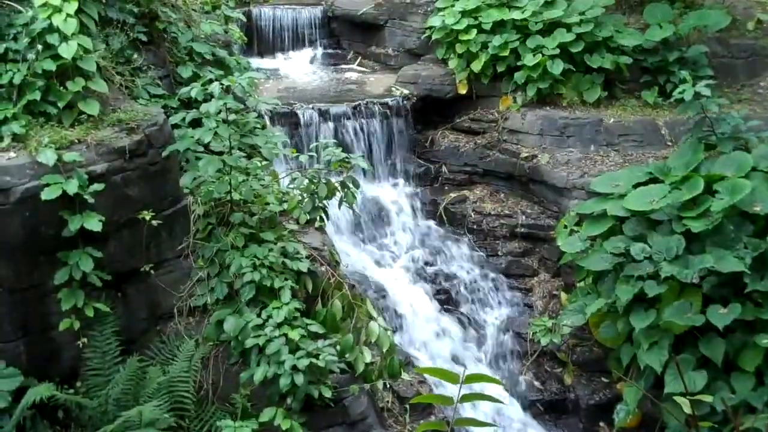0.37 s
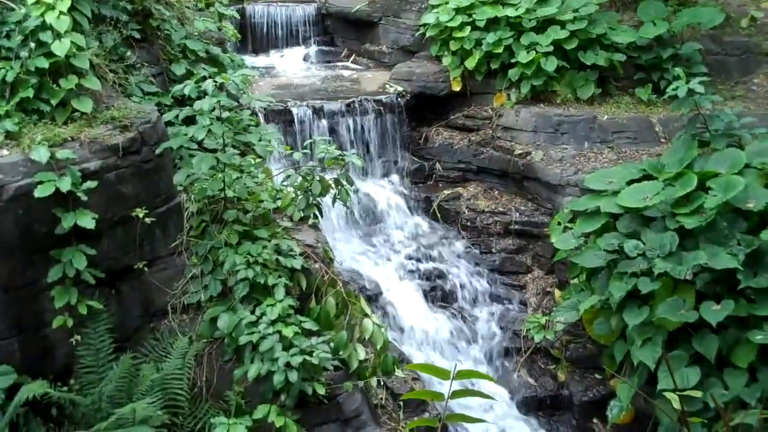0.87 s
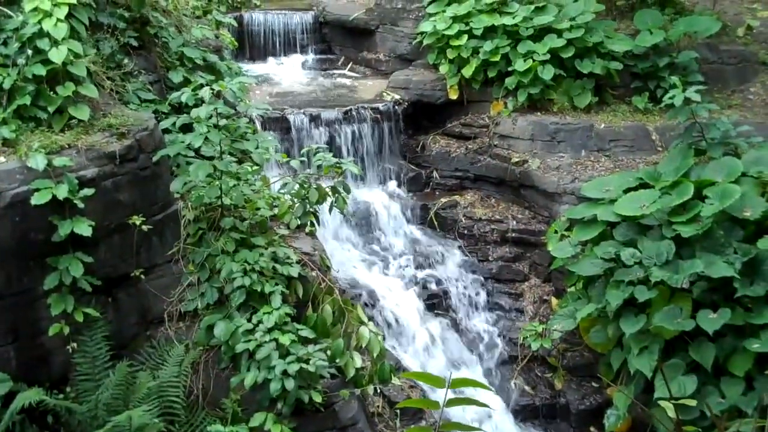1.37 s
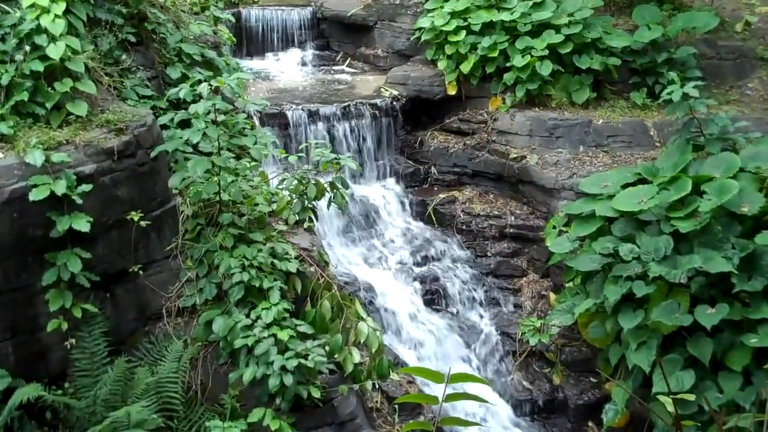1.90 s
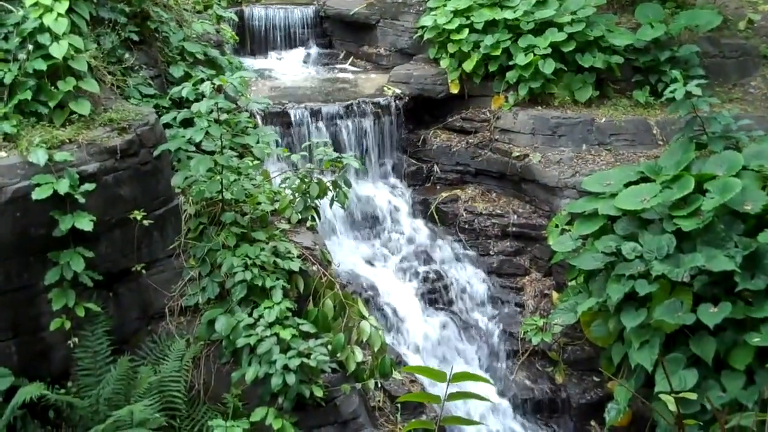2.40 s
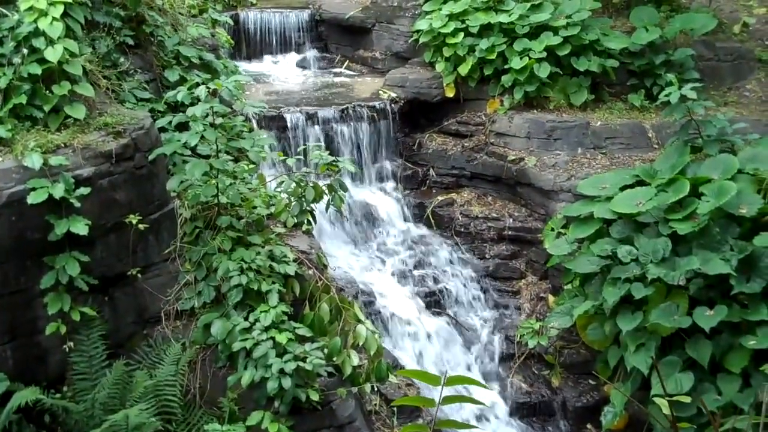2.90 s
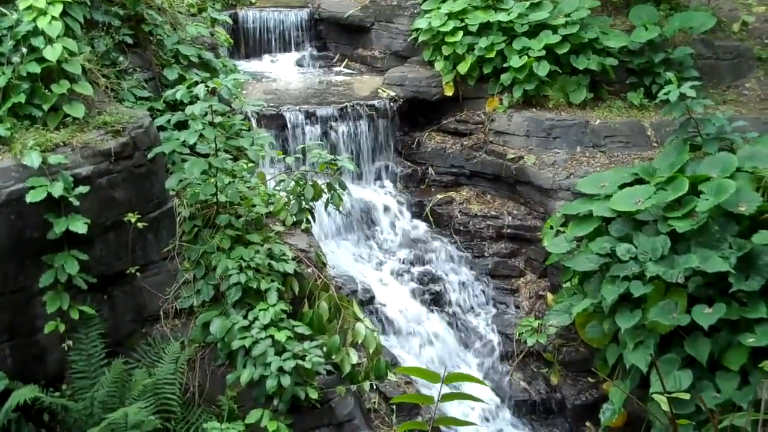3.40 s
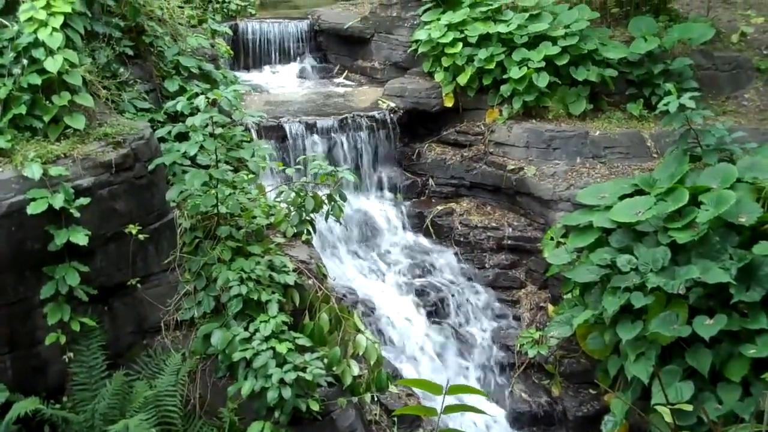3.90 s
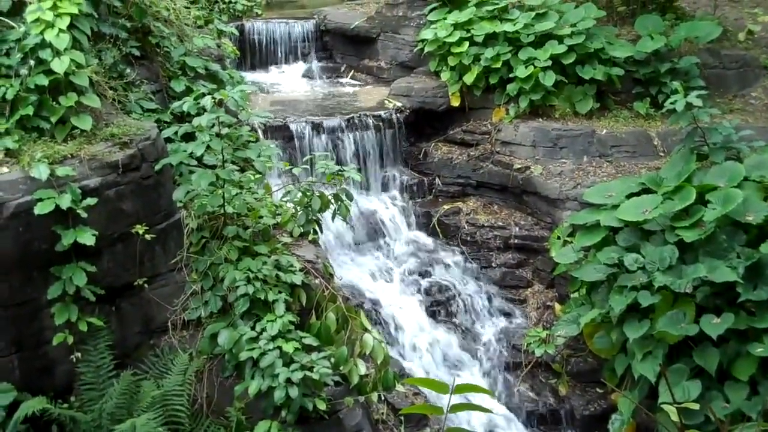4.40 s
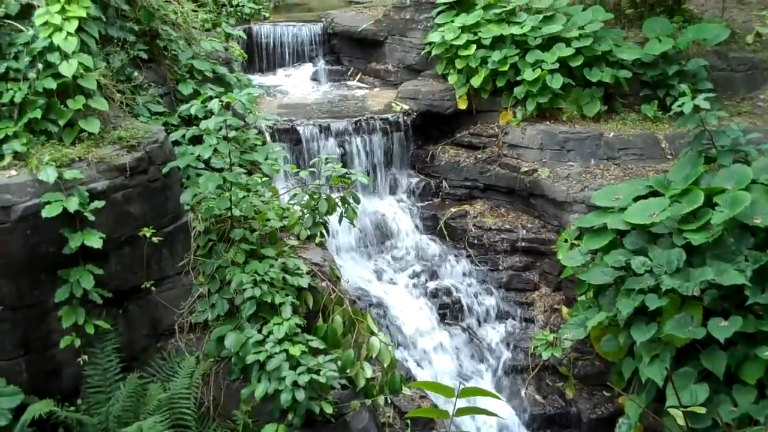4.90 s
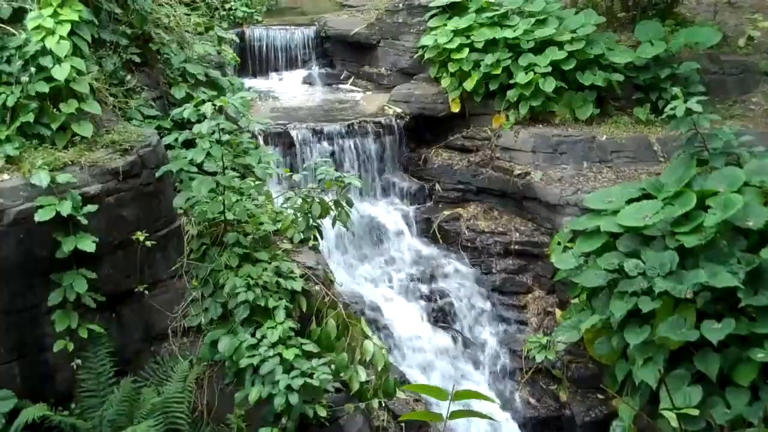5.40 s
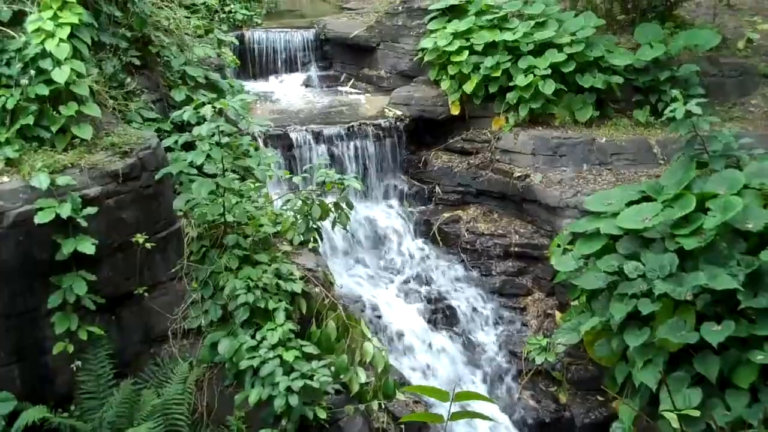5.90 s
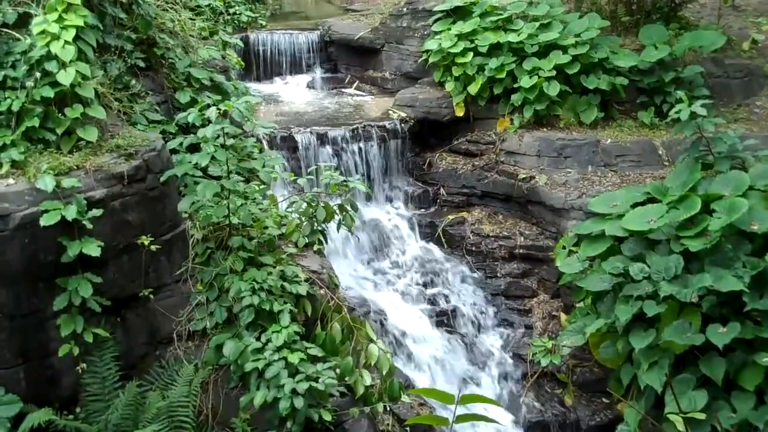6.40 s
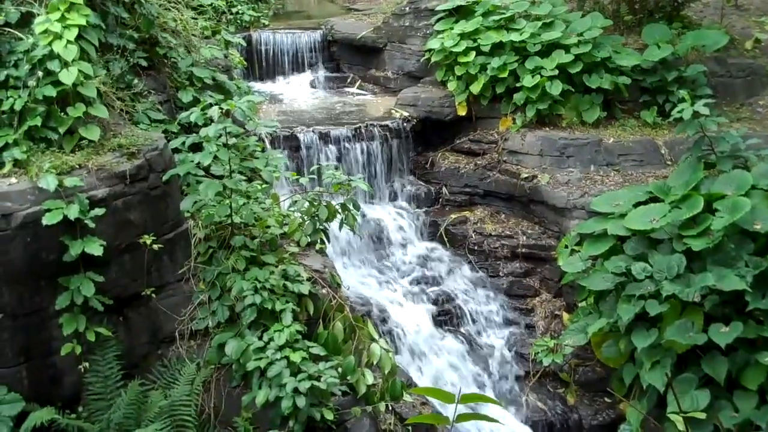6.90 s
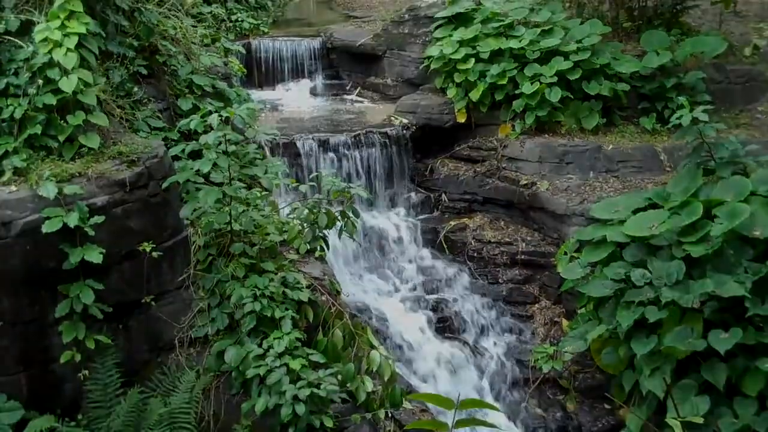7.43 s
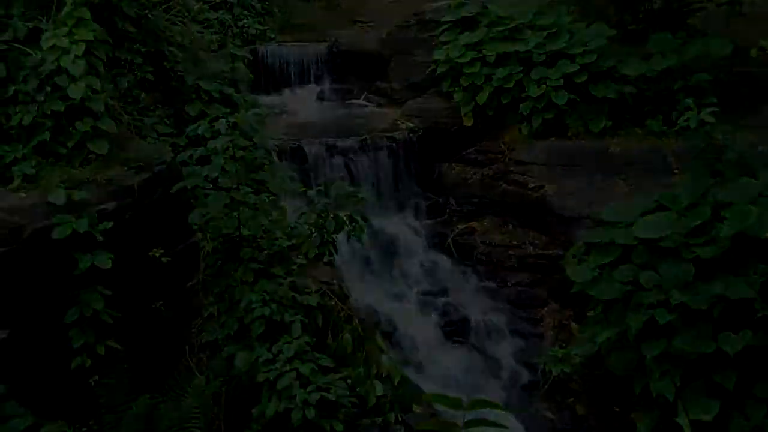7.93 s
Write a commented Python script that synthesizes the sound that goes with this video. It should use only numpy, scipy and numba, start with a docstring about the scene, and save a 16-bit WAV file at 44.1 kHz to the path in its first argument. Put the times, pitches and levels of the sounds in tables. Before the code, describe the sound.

A hand-held stereo microphone near a small waterfall among leafy plants hears continuous broad splashing: strong midrange rush, sizzling spray on top, gentle rumble beneath. Level hardly changes, with only fine flutter and two faint upward bubble gurgles nearly buried in it. A short rise opens it; a smooth fade closes it, leaving a faint trace of water.

```python
"""A small waterfall on rock ledges, a few metres from a hand-held camera with two microphone ports.
Noise and countless ringing bubbles merge into a rush, above the low noise roar of the plunge pool;
two single bubbles gurgle upward in pitch. Long waves reach both ports alike, short ones less so, and
each port rings at its own pitch. The sound fades in, and fades toward the end without reaching silence."""
import sys
import numpy as np
from scipy import signal
from scipy.fft import rfft, irfft, next_fast_len
from scipy.io import wavfile
from scipy.ndimage import uniform_filter1d, map_coordinates
from numba import njit

SR = 44100
rng = np.random.default_rng(int(sys.argv[2]) if len(sys.argv) > 2 else 0)


def file_out(sig):
    """Save sig as 16-bit WAV at sys.argv[1]."""
    # one column per channel
    cols = np.atleast_2d(sig).T
    # limit, then scale
    lim = np.clip(cols, -1, 1)
    pcm = np.round(lim * 32767).astype(np.int16)
    wavfile.write(sys.argv[1], SR, pcm)


def ratio_of_db(decibels):
    """Turn decibels (scalar or array-like) into linear amplitude factors; 0 dB maps to 1."""
    return 10 ** (np.asarray(decibels, float) / 20)


N = 354916
SIZE = next_fast_len(N)  # transform length [samples]
HZ = np.fft.rfftfreq(SIZE, 1 / SR)


def table(rows):
    """Logarithmic pitch scale: (frequency [Hz], value) rows are joined along log frequency."""
    hz, value = np.transpose(rows)
    return np.interp(np.log(HZ + 1), np.log(hz), value)


def unit(x):
    """Normalization of power: the signal is scaled to rms 1."""
    return x / np.sqrt(np.mean(x ** 2))


def surges(x, rate, per_octave, depth_db):
    """Amplitude modulation: patches of the flow swell and sink, each over a range of pitch for a moment."""
    hz, time, spectrum = signal.stft(x, SR, nperseg=512)
    pitch_place = per_octave * np.log2(1 + hz / 200)
    time_place = rate * time  # rate: random grid points per second
    where = np.meshgrid(pitch_place, time_place, indexing="ij")
    grid = rng.standard_normal((64, 400))
    gain_db = depth_db * map_coordinates(grid, where, order=1)
    return signal.istft(spectrum * ratio_of_db(gain_db), SR, nperseg=512)[1][:, :N]


# colour of the plunge pool: (frequency [Hz], gain [dB])
POOL_COLOUR = [(20, -36), (33, -28), (52, -8), (68, -16.5), (110, -12), (220, -11), (305, -6.5), (430, -13),
               (600, -27.5)]


def plunge_pool():
    """Turbulence noise: churned water roars low and heaves slowly, in three unrelated parts."""
    noise = rng.standard_normal((3, N))
    heaving = surges(noise, rate=3.4, per_octave=1.8, depth_db=0.34)
    return rfft(heaving, SIZE) * ratio_of_db(table(POOL_COLOUR))


# large bubbles that stand out: (time [s], starting frequency [Hz], relative level [dB])
LARGE_BUBBLES = [(1.9, 2700, -17), (5.56, 994, -19)]


def gurgles():
    """Bubble resonance: single long tones rise in pitch, shaken in level by the churning water."""
    length_s, rise = 0.091, 0.22  # rise: share by which the pitch climbs
    out, s = np.zeros(N), np.arange(N) / SR
    for t, start_hz, db in LARGE_BUBBLES:
        u = np.clip((s - t) / length_s, 0, 1)  # progress from 0 to 1
        swell = np.sin(np.pi * u)
        cycles = length_s * start_hz * (u + rise * u ** 2 / 2)
        out += ratio_of_db(db) * swell * np.sin(2 * np.pi * cycles)
    shake = unit(uniform_filter1d(rng.standard_normal(N), size=250))
    return rfft(out * ratio_of_db(4.5 * shake), SIZE)


@njit
def ring(start, hz, size, cycles, rise, length):
    """Damped resonance: each bubble is a decaying sine whose pitch climbs as it nears the surface."""
    out = np.zeros(length)
    for k in range(len(start)):
        w = 2 * np.pi * hz[k] / SR
        tau = cycles[k] * SR / hz[k]  # decay time [samples]
        n = min(int(4 * tau), length - start[k])
        step = np.exp(1j * w - 1 / tau)  # rotation and decay per sample
        climb = np.exp(1j * w * rise / tau)  # speeds up the rotation
        z = size[k] + 0j
        for i in range(n):
            out[start[k] + i] += z.imag
            z *= step
            step *= climb
    return out


def bubbles(low_hz, high_hz, turns, scatter_db, rise, count):
    """Random superposition: bubbles fall anywhere in time and evenly in Hz, so high octaves hold more."""
    when, pitch, loudness, damping = rng.random((count, 4)).T
    start = (when * N).astype(np.int64)
    hz = low_hz + (high_hz - low_hz) * pitch
    # high ones ring briefly but louder: an even spectrum
    size = np.sqrt(hz) * ratio_of_db(scatter_db * loudness)
    cycles = turns * (.5 + damping)
    return unit(ring(start, hz, size, cycles, rise, N))


# colour of the white water on the ledges: (frequency [Hz], gain [dB])
RUSH_COLOUR = [(300, -27.5), (430, -17.5), (570, -6), (700, -3), (830, -4.5), (1020, -1), (1450, -3),
               (2000, -2.5), (3000, -2.5), (4200, -5.5), (6500, -10.5), (8600, -11.5), (9600, -13),
               (11500, -11.5)]


def white_water():
    """Incoherent sources: three unrelated parts, one heard by both ports and one more by each."""
    parts = []
    for _ in range(3):
        spray = unit(rng.standard_normal(N))
        ringing = bubbles(349.6, 13990.0, turns=15.65, scatter_db=15.4, rise=0.0607, count=50000)
        parts.append(spray + ratio_of_db(-8) * ringing)
    quick = surges(np.array(parts), rate=36., per_octave=1.5, depth_db=0.7)
    slow = surges(quick, rate=3.7, per_octave=0.19, depth_db=0.11)
    return rfft(slow, SIZE) * ratio_of_db(table(RUSH_COLOUR))


# how alike both ports hear the wide fall: (frequency [Hz], squared coherence [0-1])
COHERENCE = [(30, .7), (70, .99), (300, .99), (430, .9), (600, .98), (1150, .95), (1450, .64), (3050, .7),
             (3600, .33), (7000, .27), (9800, .02)]
# right port against left, slightly different below 10 kHz and much duller above:
# (frequency [Hz], gain [dB])
RIGHT_BALANCE = [(700, 1.15), (1350, -0.8), (2330, 2), (3300, -.5), (5240, -0.5), (7000, 0), (9700, -1),
                 (12100, -14), (14200, -43)]


def scene():
    """Spatial coherence: short waves from the wide fall reach the two ports less alike than long ones."""
    right_lead_s = 3.2e-5  # the right port is nearer the fall, so it hears it first
    both, left, right = plunge_pool() + white_water()
    share = np.sqrt(table(COHERENCE))  # share of the power common to both ports
    common = np.sqrt(share) * both
    separate = np.sqrt(1 - share) * np.array([left, right])
    pair = common + separate + gurgles()
    right_response = ratio_of_db(table(RIGHT_BALANCE)) * np.exp(2j * np.pi * HZ * right_lead_s)
    return irfft(pair * np.array([np.ones(len(HZ)), right_response]), SIZE)[:, :N]


# port cavities, left then right: (resonance [Hz], sharpness Q [1], bass cut [Hz])
PORT_CAVITIES = [(7350, 7.6, 71), (6116, 7.75, 17)]


def port_cavities(dry):
    """Cavity resonance: each port is a resonant second-order low-pass, with a first-order bass cut."""
    responses = []
    for hz, q, cut_hz in PORT_CAVITIES:
        bass_cut = 1j * HZ / (cut_hz + 1j * HZ)
        resonance = 1 / (1 - (HZ / hz) ** 2 + 1j * HZ / hz / q)
        responses.append(bass_cut * resonance)
    return irfft(rfft(dry, SIZE) * np.array(responses), SIZE)[:, :N]


def top_cut(x):
    """Nothing passes above the cut-off."""
    return signal.sosfilt(signal.butter(12, 14190, fs=SR, output="sos"), x)


def record(dry):
    """Linear reception: port resonance, a steady level, and fades straight in amplitude."""
    level_db = -19  # rms of the mean of both ports, before the fades
    fade_in_s, fade_in_from_db = .38, -3.5
    fade_out_at_s, fade_out_s = 7.322, 0.94  # the sound ends before this fade is complete
    heard = port_cavities(dry)
    s = np.arange(N) / SR
    fade_in = np.interp(s, [0, fade_in_s], [ratio_of_db(fade_in_from_db), 1])
    fade_out = np.clip(1 - (s - fade_out_at_s) / fade_out_s, 0, 1)
    steady = ratio_of_db(level_db) * heard / np.std(heard.mean(axis=0))
    return top_cut(steady * fade_in * fade_out)


dry = scene()
out = record(dry)
file_out(out)
```